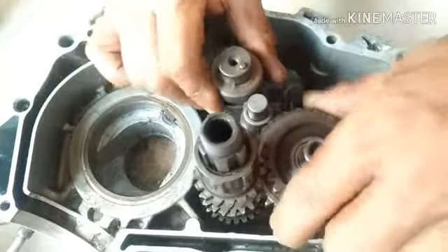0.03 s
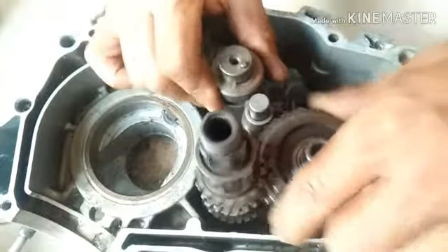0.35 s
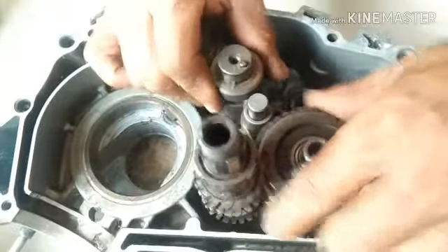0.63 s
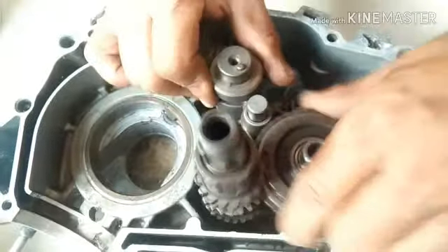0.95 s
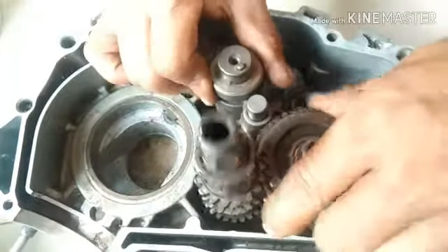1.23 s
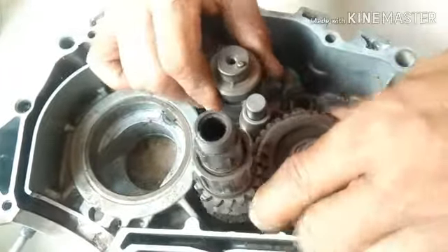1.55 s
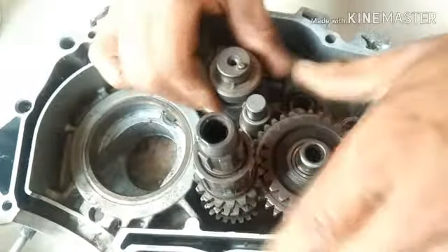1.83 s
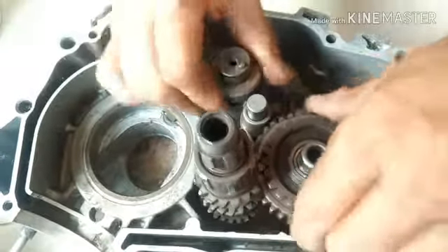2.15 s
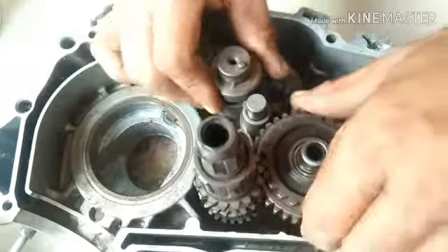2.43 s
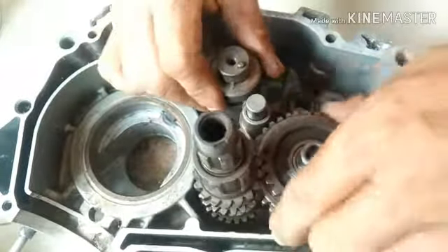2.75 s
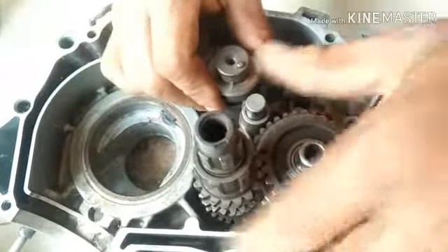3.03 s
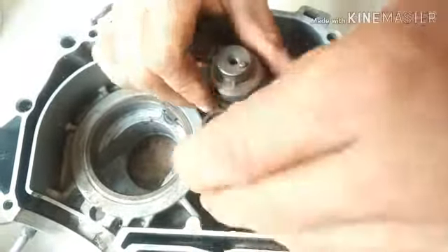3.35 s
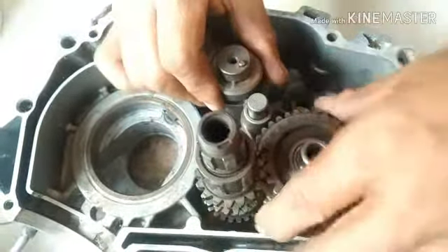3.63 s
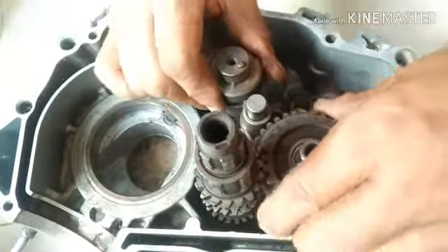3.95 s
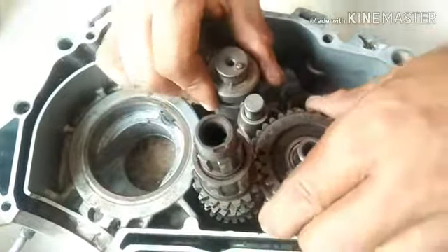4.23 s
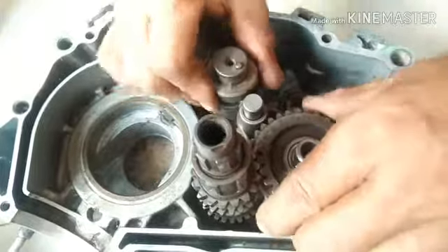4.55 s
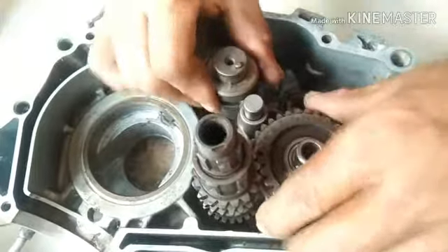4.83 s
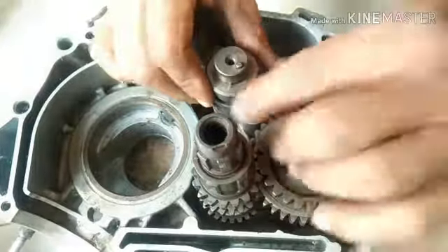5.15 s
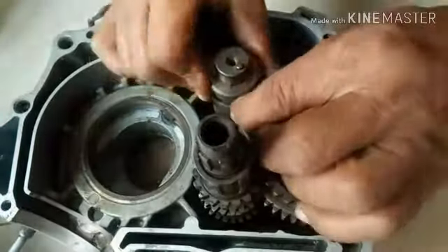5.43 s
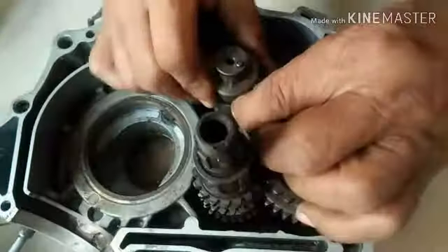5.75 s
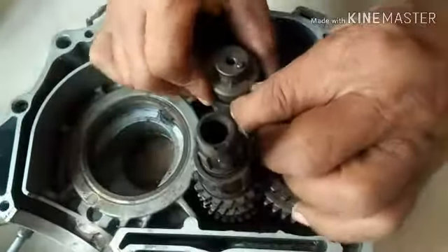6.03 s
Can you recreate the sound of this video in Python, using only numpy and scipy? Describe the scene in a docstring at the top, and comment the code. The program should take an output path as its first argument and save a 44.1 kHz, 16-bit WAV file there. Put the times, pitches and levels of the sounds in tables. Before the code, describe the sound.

Steel gears are turned and shifted by hand inside an open engine case. Their teeth click and clack in quick, uneven clusters, with brief ringing and tiny high chirps of steel slipping on steel. The clatter is busiest in the first two seconds, thins to soft scattered ticks after three, and ends with a few sharper clicks. The microphone is close, in a quiet workshop.

```python
"""A quiet workshop, one microphone close to an open motorcycle engine case.
Steel gears and shift parts are turned and shifted by hand: teeth and dogs knock and chatter, the cast
case rings under them, and small parts chirp high above as steel slips over steel. Hands brush and bump
the work, faint room air lies below, and the recorder's noise gate shortens the treble tails."""
import sys
import numpy as np
from scipy.fft import rfft, irfft, next_fast_len
from scipy.io import wavfile
from scipy.ndimage import uniform_filter1d, map_coordinates

SR = 44100
rng = np.random.default_rng(int(sys.argv[2]) if len(sys.argv) > 2 else 0)


def waveform_to_disk(signal):
    """Save audio, clipped to [-1, 1], as 16-bit WAV at the path in sys.argv[1]."""
    frames = np.transpose(np.atleast_2d(signal))
    scaled = np.clip(frames, -1, 1) * 32767
    samples = np.round(scaled).astype(np.int16)
    wavfile.write(sys.argv[1], SR, samples)


N = 268569

# Tooth and dog contacts. Each row: start in seconds, knock level in dB, hardness as dB of treble,
# shaft ring in dB, seconds to the rebound (0 if it stays seated).
CONTACTS = [ (.436, -26, -7.5, 9.5, 0.003), (.458, -18.5, 1, -5, 0.0064), (.613, -35.5, -20.5, 9.5, 0),
            (0.696, -27.5, -16.5, -0.5, 0.00055), (.709, -14, -4, 0.5, 0.02),
            (0.739, -19.5, 2.5, 4.5, 0.00079), (.803, -20.5, 0, -15, 0.00058),
            (.81, -20, 7, -18.5, 0.00286), (.829, -15.5, -1.5, 5.5, 0.028), (.866, -16, 3, 6.5, 0.012),
            (.882, -16, -17, 2.5, 0.00152), (1.067, -12, 1, -.5, .022), (1.132, -22.5, -12, 7, 0.00002),
            (1.1415, -19.5, 13.5, -25.5, 0.01644), (1.1457, -10.5, 4.5, 14, 0.00054),
            (1.309, -22, -22.5, 8, 0.0013), (1.34, -23.5, -12.5, -4, 0.00076), (1.419, -17, 3, 2, 0.0069),
            (1.437, -12, -6, -12, 0.01264), (1.492, -12.5, 5, 2.5, 0.0195),
            (1.618, -27.5, -9.5, -15, 0.0119), (1.681, -17.5, 3.5, 1.5, 0.0254),
            (1.743, -34.5, 7.5, 9, 0.00066), (1.78, -20.5, -1.5, 4, 0), (1.848, -32.5, 1, 9.5, 0),
            (1.877, -10, 0, 0, 0.00085), (1.944, -19.5, 11.5, -13.5, 0.00018),
            (1.959, -14.5, 4.5, 8, 0.01024), (1.989, -19.5, 14, -9.5, 0.0014),
            (1.997, -17, 0.5, 9.5, 0.00034), (2.184, -29.5, 13, -9, 0.00065),
            (2.192, -14.5, -22, -11, 0.00053), (2.213, -24.5, 3.5, -10.5, 0.00105),
            (2.472, -26, -20.5, -4, 0), (2.485, -26.5, -4.5, -3.5, 0.04786),
            (2.7275, -16.5, -0.5, 4.5, 0.00068), (2.787, -25, -3.5, 9.5, 0.00106),
            (2.81, -23.5, -13.5, 6, 0.00152), (2.931, -33, -25.5, 2.5, 0.0004),
            (2.986, -25.5, 2, 10, 0.02066), (3.019, -25, -6.5, 8, 0.0201), (3.049, -16.5, 0, 1, 0.0272),
            (3.305, -32, -41, -12, .021), (3.354, -33, -6, -7.5, 0), (3.729, -40, -24, -6.5, 0.00148),
            (3.899, -35, 0.5, 1, 0), (4.057, -42.5, -10.5, -0.5, .033), (4.16, -31, -9.5, -9, 0.000072),
            (4.174, -35, -15, 9, 0.00162), (4.209, -20.5, -25, -6.5, 0.00094), (4.327, -29.5, -12, -1, 0),
            (4.436, -30, -18, -2.5, 0.00053), (4.535, -39, -28, 5, 0), (4.54, -20.5, -30.5, 4, 0.00022),
            (4.717, -29.5, -10, -5, 0.0318), (4.933, -32, -15.5, -14.5, 0.00062),
            (4.999, -28, -24.5, -1.5, 0.0076), (5.318, -34.5, -37, -5.5, 0.0033),
            (5.329, -30, -26, -9, 0.03742), (5.7599, -31.5, -19, 0, 0.00081),
            (5.77, -28.5, -16, -4, 0.00464), (5.816, -30, -37.5, -7.5, 0),
            (5.923, -37, -37.5, -7.5, 0.0018), (6.005, -25, -22.5, -2.5, 0), (6.015, -19.5, 2.5, -7, 0.002),
            (6.03, -18, -4, 4.5, 0)]
FORCEFUL_DB = -19.5  # knock level above which the teeth chatter and the case rocks


def amp(db):
    """Decibels to gain."""
    return 10 ** (np.asarray(db) / 20)


def along(points, hz):
    """Read (Hz, value) points on a log frequency axis."""
    point_hz, values = np.transpose(points)
    return np.interp(np.log(hz + 1), np.log(point_hz + 1), values)


def filtered(x, response):
    """Apply a gain that depends on frequency."""
    size = x.shape[-1]
    padded = next_fast_len(size + 2048)
    gain = response(np.fft.rfftfreq(padded, 1 / SR))
    return irfft(rfft(x, padded) * gain, padded)[..., :size]


def noise(spectrum, size):
    """Noise of rms 1, coloured by (Hz, dB) points."""
    coloured = filtered(rng.standard_normal(size), lambda hz: amp(along(spectrum, hz)))
    return coloured / np.sqrt(np.mean(coloured ** 2) + 1e-20)


def wobble(size, step):
    """A smooth random curve with a knot every step points."""
    knots = rng.standard_normal(int(size / step) + 4)
    return map_coordinates(knots, [np.arange(size) / step])


def fade(t, t60):
    """Free decay: 60 dB down after t60 seconds."""
    return np.exp(-np.log(1000) * t / t60)


def swell(t, rise_s):
    """Smooth build-up from 0 to 1."""
    return 1 - np.exp(-(t / rise_s) ** 2)


def add(track, start_s, sound):
    """Mix a sound into the track."""
    start = max(round(start_s * SR), 0)
    part = track[start:start + len(sound)]
    part += sound[:len(part)]


def workshop(air_db=-72, drift_db=3.5):
    """The low rush of the room's air, drifting a little."""
    # Room tone. Each row: frequency in Hz, spectral level in dB.
    air = [(25, -7.5), (50, -2.5), (75, -7.5), (125, -2), (190, -7.5), (300, -8.5), (400, -13), (750, -10),
           (1500, -14.5), (2300, -16.5), (4000, -22), (9000, -23.5), (14000, -27.5)]
    drift = wobble(N, SR // 8)
    return amp(air_db + drift_db * drift) * noise(air, N)


def handling(regrip_db=-1, resting_db=-78, lumpy_db=4):
    """The case rumbles faintly and unevenly under the hands, and more while the grip changes."""
    # The hand shifts its grip. Each row: time in seconds, rumble level in dB.
    grip_levels = [(3.0, -71), (3.1, -58), (3.136, -66), (3.212, -61), (3.272, -74), (3.32, -65),
                   (3.47, -55.5), (3.494, -64), (3.534, -59), (3.562, -71), (3.62, -75)]
    # The case's rumble. Each row: frequency in Hz, spectral level in dB.
    rumble = [(25, -25.5), (50, -10), (90, -3), (128, 1), (155, -4), (200, -21), (400, -36), (1000, -80.5)]
    t = np.arange(N) / SR
    times, db = np.transpose(grip_levels)
    regrip = amp(regrip_db + np.interp(t, times, db, left=-120, right=-120))
    lumps = wobble(N, SR // 14)
    resting = amp(resting_db + lumpy_db * lumps) * swell(t, rise_s=0.8)
    return (regrip + resting) * noise(rumble, N)


def fingers(uneven_db=2):
    """Skin brushes over metal with a fine hiss; each stroke swells and fades."""
    # Finger strokes. Each row: middle in seconds, level in dB, half length in seconds.
    strokes = [(0.288, -67, 0.0637), (3.699, -75, 0.2058), (3.863, -67, 0.0502), (4.149, -78.5, .18)]
    # Hiss of skin on metal. Each row: frequency in Hz, spectral level in dB.
    hiss = [(500, -8), (2000, 2.5), (6000, -7), (9000, 7), (12000, -2), (14500, -21)]
    t = np.arange(N) / SR
    envelope = sum(amp(db) * np.exp(-((t - middle) / half) ** 2) for middle, db, half in strokes)
    grip = wobble(N, SR // 40)
    return envelope * amp(uneven_db * grip) * noise(hiss, N)


def tooth_scrapes(scrape_db=-28):
    """Before it drops home, a tooth scrapes dully along its neighbour's flank."""
    # The scrape's colour. Each row: frequency in Hz, spectral level in dB.
    flank = [(200, -24), (450, -14.5), (700, 3.5), (1500, -10.5), (2500, -12.5), (14000, -39.5)]
    track, t = np.zeros(N), np.arange(SR // 30) / SR
    build_up = fade(t[::-1], t60=0.05)
    for start, db, *_ in CONTACTS:
        add(track, start - t[-1], amp(db + scrape_db) * noise(flank, len(t)) * build_up)
    return track


def blows(chatter_db=-15.5, rebound_db=-6.5, duller_db=-7, glancing_db=-9.5):
    """Yield each contact, and any glancing chatter or rebound, as (s, knock dB, hardness dB, ring dB)."""
    for start, db, hard_db, ring_db, rebound_s in CONTACTS:
        settle_s = 0.012 * rng.uniform(0.6, 1.5)
        yield start, db, hard_db, ring_db
        if db > FORCEFUL_DB:  # the teeth chatter once more before they settle
            yield start + settle_s, db + chatter_db, hard_db, ring_db + glancing_db
        if rebound_s > 0:  # back across the backlash, weaker and softer
            yield start + rebound_s, db + rebound_db, hard_db + duller_db, ring_db + glancing_db


def ring(modes, t, scatter_db=0.5, colour=np.zeros_like):
    """Decaying modes; each blow lands elsewhere and shares its energy out anew."""
    hz, db, t60 = np.transpose(modes)
    gain = amp(db + colour(hz) + scatter_db * rng.standard_normal(len(hz)))
    phase = rng.uniform(0, 2 * np.pi, (len(hz), 1))
    return gain @ (np.sin(2 * np.pi * hz[:, None] * t + phase) * fade(t, t60[:, None]))


def gear_knocks(gears_db=-11, shaft_db=-12, bounce_db=2, spot_db=4):
    """Each blow cracks, shakes the crowded modes of the gear cluster and leaves shaft and case ringing."""
    # The colour of a contact. Each row: frequency in Hz, spectral level in dB.
    clack = [(60, -45), (200, -28), (400, -35.5), (560, -18), (740, -1.5), (1050, -1), (1400, 1.5),
             (1900, -4.5), (2300, -6), (3000, -4), (5000, -7), (8000, -10.5), (11000, -13), (14000, -23)]
    # The gears and the cast case around them. Each row: frequency in Hz, level in dB, t60 in seconds.
    gear_modes = [(742.6, -8, 0.051), (765.3, -5, 0.047), (994.5, -12.5, 0.2082), (1180, -16, 0.027),
                  (1347, -9.5, 0.022), (2967.7, -12, .11), (3290, -18.5, .12), (3378, -18.5, .11),
                  (3680.5, -13.5, 0.085), (4212, -15, 0.064), (4690, -14, 0.11), (4936, -18, 0.13),
                  (5739, -19, 0.17), (6456, -23, .12), (7636, -13.5, 0.08), (8313, -11.5, 0.11)]
    # The hollow main shaft, rung by square blows. Each row: frequency in Hz, level in dB, t60 in seconds.
    shaft_modes = [(1413, -10.5, 0.06), (1525.2, -7.5, 0.145), (1878.7, -24.5, 0.12), (1905, -27.5, 0.13),
                   (2092, -34, 0.46), (2096, -27, 0.22)]
    track, t = np.zeros(N), np.arange(SR // 4) / SR
    crack = amp(-8) * fade(t, t60=0.0047)
    body = amp(-10.5) * fade(t, t60=0.056)
    room = amp(-24) * fade(t, t60=0.1859)
    envelope = np.sqrt(crack ** 2 + body ** 2 + room ** 2)
    for start, db, hard_db, ring_db in blows():
        # a hard, dry contact reaches far into the treble; an oily one only knocks
        mid_db = -1 + 0.55 * hard_db
        tilt = [(950, 0.0056), (1700, 0.091 * mid_db), (2900, mid_db), (4000, mid_db), (9000, hard_db)]
        hardness = lambda hz: along(tilt, hz)
        # each spot on a gear favours other resonances, and the teeth bounce within their backlash
        spot = lambda hz: spot_db * wobble(len(hz), 100)
        bounces = amp(bounce_db * wobble(len(t), 70))
        cluster = filtered(noise(clack, len(t)), lambda hz: amp(hardness(hz) + spot(hz)))
        clatter = cluster * envelope * bounces
        gears = amp(gears_db) * ring(gear_modes, t, colour=hardness)
        shaft = amp(shaft_db + ring_db) * ring(shaft_modes, t)
        add(track, start, amp(db) * swell(t, rise_s=0.001518) * (clatter + gears + shaft))
    return track


def chirps(slips, modes, release_s=0.012, tail_db=-12, waver_rad=0.58):
    """Slipping steel drives a small part at its own pitches; after the slip only a weak ring is left."""
    track, t = np.zeros(N), np.arange(SR // 4) / SR
    tail = amp(tail_db)
    for start, db, slip_s in slips:
        since_slip = np.maximum(t - slip_s, 0)
        drive = swell(t, rise_s=0.00069) * (tail + (1 - tail) * np.exp(-since_slip / release_s))
        detune = 1 + 0.004 * rng.standard_normal()  # pitch shifts with the pressure on the part
        for hz, mode_db, t60 in modes:
            phase = 2 * np.pi * hz * detune * t + waver_rad * wobble(len(t), 130)
            add(track, start, amp(db + mode_db) * drive * fade(since_slip, t60) * np.sin(phase))
    return track


def idler_gear():
    """The small idler gear sings as it slides on its splines."""
    # The idler's slides. Each row: start in seconds, level in dB, length in seconds.
    slips = [(.466, -34.5, 0.0049), (3.858, -63.5, 0.01005), (4.438, -54, 0.00772), (4.719, -49, 0.0133)]
    # The idler's modes. Each row: frequency in Hz, level in dB, t60 in seconds.
    modes = [(2968.6, 0.5, 0.148), (5774, -7.5, 0.29)]
    return chirps(slips, modes)


def case_thumps(growth=1.608):
    """A forceful blow rocks the heavy case briefly on its support."""
    # Rocking modes. Each row: frequency in Hz, level in dB at a just forceful blow, t60 in seconds.
    rocking = [(91, -61, 0.2), (128, -68, .2), (284.7, -66, 0.2)]
    track, t = np.zeros(N), np.arange(SR // 3) / SR
    onset = swell(t, rise_s=0.0032)
    for start, db, *_ in CONTACTS:
        if db > FORCEFUL_DB:
            push_db = growth * (db - FORCEFUL_DB)
            for hz, mode_db, t60 in rocking:
                phase = 2 * np.pi * hz * t + wobble(len(t), SR // 40)
                add(track, start, amp(push_db + mode_db) * onset * fade(t, t60) * np.sin(phase))
    return track


def thrust_washer():
    """A loose thrust washer slips and chirps on one very high note."""
    # The washer's slips. Each row: start in seconds, level in dB, length in seconds.
    slips = [(.739, -23, 0.0035), (1.150, -37, .03), (1.311, -55, 0.009), (1.495, -39.5, 0.022),
             (5.772, -52.5, 0.00808)]
    # The washer's mode. One row: frequency in Hz, level in dB, t60 in seconds.
    modes = [(11105, -2, .13)]
    return chirps(slips, modes)


def shift_fork():
    """The shift fork chirps as steel slips over it."""
    # Slips over the fork. Each row: start in seconds, level in dB, length in seconds.
    slips = [(.755, -39, 0.0077), (.795, -36, 0.0037), (1.072, -22.5, 0.0031), (1.1455, -20, 0.00177),
             (1.451, -23, 0.0065), (1.743, -38.5, 0.0041), (1.987, -27.5, 0.00867), (2.186, -31, 0.007408),
             (2.195, -22, .011), (2.229, -39, 0.024), (2.265, -49.5, 0.0261), (2.729, -36.5, 0.005832),
             (4.08, -60, 0.01543), (4.160, -45.5, 0.0139)]
    # The fork's modes. Each row: frequency in Hz, level in dB, t60 in seconds.
    modes = [(4873, -16.5, 0.15), (6880, -25.5, .1), (8272, -1, 0.12), (11570, -16, .13)]
    return chirps(slips, modes)


def dog_stops():
    """A dog bottoms in its slot and gives one short push of air, with hardly any ring."""
    # Dead stops. Each row: middle in seconds, level in dB, pitch in Hz.
    stops = [(1.1465, -20, 900), (1.4373, -15, 1050), (2.186, -38, 520), (2.194, -39.5, 550)]
    track, t = np.zeros(N), np.arange(-SR // 100, SR // 100) / SR
    for middle, db, hz in stops:
        cycles = hz * t
        push = np.sin(2 * np.pi * cycles) * np.exp(-2 * cycles ** 2)
        add(track, middle + t[0], amp(db) * push)
    return track


def scene():
    """Gears, hands and room at one close microphone."""
    knocks = gear_knocks() + tooth_scrapes() + dog_stops() + case_thumps()
    slips = shift_fork() + thrust_washer() + idler_gear()
    return (knocks + slips + fingers() + handling() + workshop())[None]


def noise_gate(x, threshold_db=-63, depth_db=-4.5, split_hz=2400):
    """The treble is turned down whenever it sinks under the threshold."""
    treble = filtered(x, lambda hz: 1 - 1 / (1 + (hz / split_hz) ** 4))
    power = np.abs(uniform_filter1d(treble ** 2, size=SR // 100))
    shut = 1 / (1 + (power / amp(threshold_db) ** 2) ** 2)
    return x - treble * shut * (1 - amp(depth_db))


def record(dry):
    """The recorder's noise gate, then its steep band limit."""
    top_hz = 14250
    return filtered(noise_gate(dry), lambda hz: 1 / np.sqrt(1 + (hz / top_hz) ** 200))


dry = scene()
out = record(dry)
waveform_to_disk(out)
```